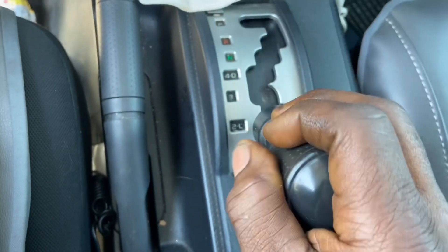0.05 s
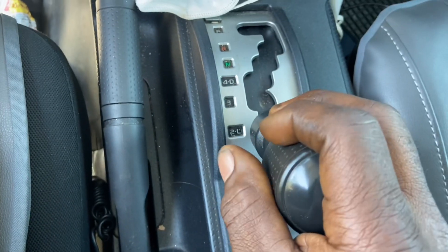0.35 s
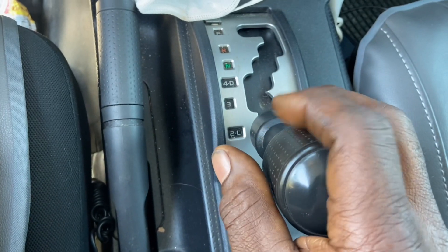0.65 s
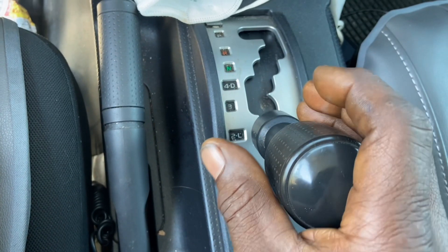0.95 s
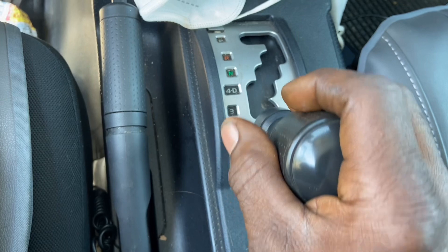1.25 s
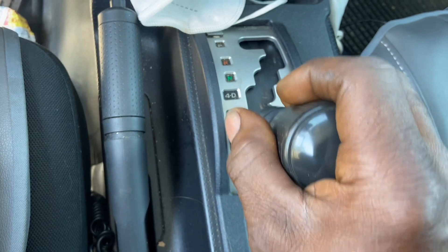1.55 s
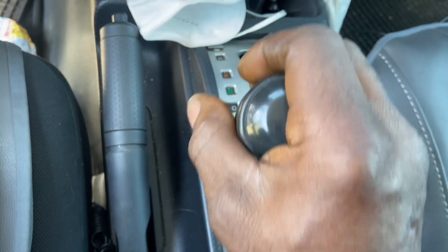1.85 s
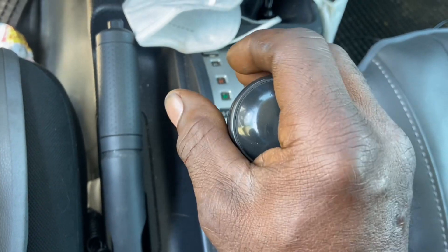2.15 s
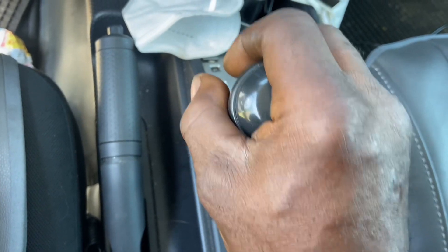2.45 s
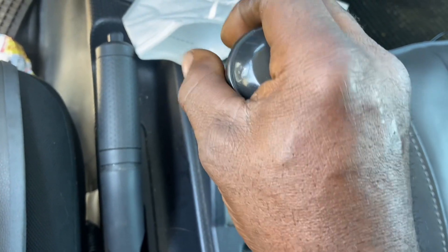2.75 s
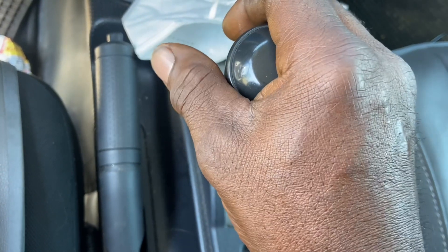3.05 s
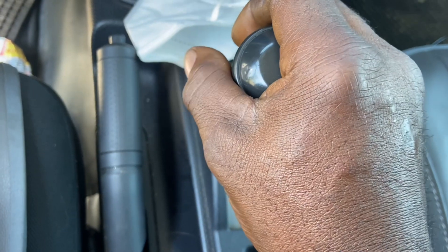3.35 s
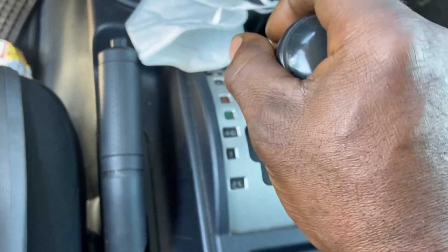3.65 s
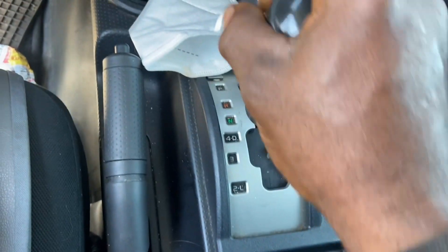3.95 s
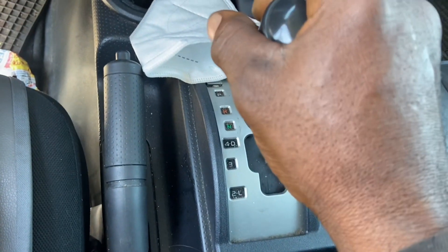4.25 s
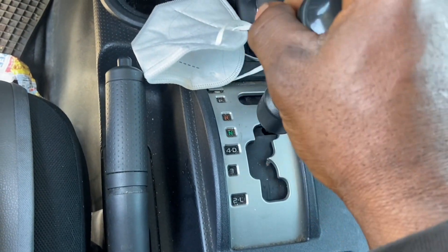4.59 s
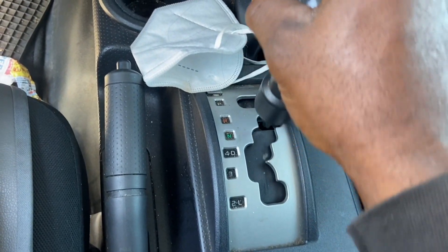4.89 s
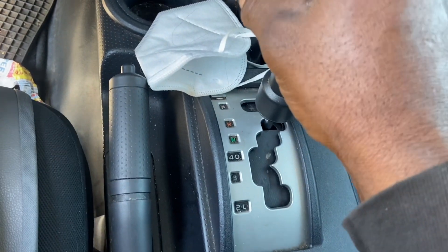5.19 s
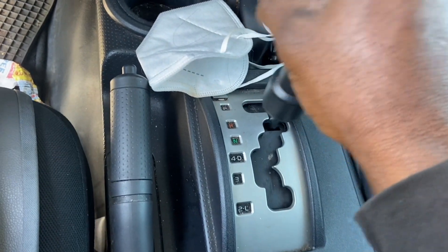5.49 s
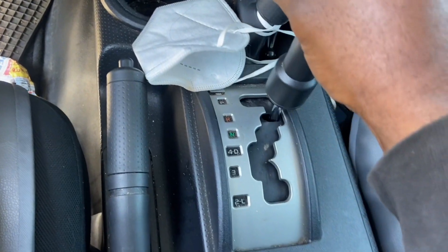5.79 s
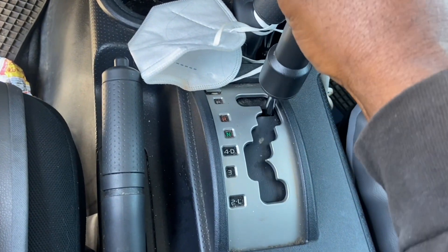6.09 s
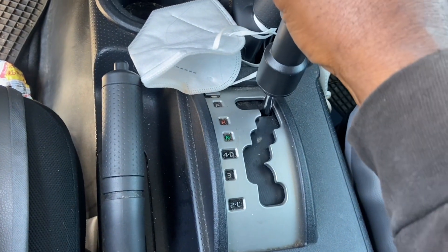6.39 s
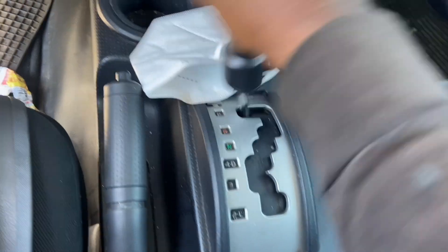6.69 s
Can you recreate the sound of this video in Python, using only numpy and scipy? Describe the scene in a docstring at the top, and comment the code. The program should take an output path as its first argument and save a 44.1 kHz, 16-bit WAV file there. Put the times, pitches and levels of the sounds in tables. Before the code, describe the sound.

Inside a parked car, a petrol engine idles with a low hum over steady fan noise and a very faint high whine. Close by, a gear selector moves through its stepped gate, each stop giving a plastic click and a hollow console thud, sometimes with a low boom from the body. Light knocks come in the first second, a firm rattling clunk at 1.7 seconds and a dull knock at 2.6. Outside, tyre noise from a passing vehicle swells, peaks around 3.5 seconds and slowly fades. A sharp metallic double snap sounds at 3.5, a thud at 4, a light click at 4.5 and a strong clack at 4.9. The idle rises from about 4.5 seconds, then drops near 5.7 with a thud and a low shudder. Around 6.6 to 6.8 seconds the lever scrapes and rattles through a quick cluster of clicks.

```python
"""A gear selector is worked through its stepped gate inside a parked car: each stop scrapes, clicks,
rings the steel latch and plastic plate and thuds in the console shell; the body booms as load shifts.
The V6 petrol engine idles, its orders humming through body resonances, and speeds up in neutral.
Outside, a vehicle rolls by with a slow swell of tyre noise. Under it all: fan noise, a faint whine."""
import sys
import numpy as np
from scipy import signal
from scipy.fft import rfft, irfft
from scipy.io import wavfile
from scipy.ndimage import uniform_filter1d, map_coordinates

SR = 44100
rng = np.random.default_rng(int(sys.argv[2]) if len(sys.argv) > 2 else 0)


def transcribe(u):
    """Save the signal u as a 16-bit wav file named by the first command-line argument.

    u: samples, shape (n,) or (channels, n), limited to [-1, 1]; the rate is SR.
    q: integer samples, one column per channel.
    """
    v = np.clip(np.atleast_2d(u).T, -1, 1)
    q = np.round(v * 32767).astype(np.int16)
    wavfile.write(sys.argv[1], SR, q)


N = 301316
T = np.arange(N) / SR
HZ = np.maximum(np.arange(N // 2 + 1) * SR / N, 1)

# Table levels are relative; the functions add their own gains.
# lever on gate: t/s, level/dB, click offset/dB, thud offset/dB, scrape time/s, top f/Hz
KNOCKS = [(.002, -44, -14, 13, 0.0048, 1780), (.709, -45, -20, 1, .0005, 1700),
          (1.014, -49, -23, 3, 0.0017, 1600), (1.6845, -32.5, -20, 3.5, 0.00072, 1700),
          (1.6895, -33, -22, 6.5, .0014, 900), (1.702, -48, 0.5, 13, .006, 2000),
          (1.817, -42, -18, 2, .0006, 1720), (1.849, -47.5, -11, 5, 0.0029, 1890),
          (2.581, -33.5, -29, 2, 0.0029, 1060), (3.959, -36.5, -12, 10, 0.0045, 1800),
          (4.491, -47, -13, 3, 0.00094, 2200), (4.907, -41, -2.5, 3, 0.0043, 3000),
          (4.915, -26, -8.5, 2, 0.00092, 2400), (5.469, -53.5, -8, 4, 0.0031, 4000),
          (5.696, -46.5, -17, 7.5, .022, 1480), (5.933, -51.5, -11, 3.5, 0.0021, 3000),
          (6.239, -57.5, -13, 17, 0.01, 1600), (6.589, -49, 0, 4, .0088, 4000),
          (6.603, -39.5, -10, 4, 0.00057, 2600), (6.612, -39.5, -10, 11.5, 0.0041, 2200),
          (6.645, -53, -12, 14, 0.0036, 2000), (6.67, -53, -1, 13, 0.0065, 1500),
          (6.699, -41, -9, 4, 0.0044, 2200), (6.71, -39.5, -12, 6.5, 0.0022, 2200)]
# detent snaps: t/s, level/dB, thud offset/dB, latch offset/dB, knock offset/dB, favoured f/Hz
DETENTS = [(3.546, -37, -2, 9, 2, 3920), (3.562, -30.5, 1.5, 1.5, -13, 2720), (4.541, -54, 9, 3, -1, 3920),
           (4.86, -54.5, 0, -5, -8, 7500), (5.549, -52, 11, 0, 0, 3920), (5.563, -61, -3, -7, -8, 6300),
           (5.97, -56, -9, -7, -6, 3920), (6.686, -54, 0, -6, -9, 7500), (6.757, -61, 0, -11, -12, 7500)]
# modes: f/Hz, level/dB, t60/s
SHELL_MODES = [(131.8, -1.5, 0.11), (177.2, 0, 0.16), (216, 1, 0.13), (252, -0.5, 0.11), (285.3, 4.5, 0.08),
               (342.7, -12, 0.18), (378.4, -3.5, 0.084), (440, 1, 0.07), (508.5, -4.5, 0.084),
               (620, -19, 0.099)]  # hollow console
PLATE_MODES = [(724, 4.5, 0.11), (860, -11, 0.023), (990, 7, 0.074), (1260, -2, 0.02), (1564, 11, 0.033),
               (1827, 9, 0.02), (2200, 9.5, 0.023), (2690, 2, 0.023), (3230, -1, 0.02)]  # plastic gate plate
LATCH_MODES = [(1620, 0, .03), (1900, 0, .03), (2720, -3, .028), (3350, -7, .018), (3920, -3, .024),
               (4780, -13, .018), (6300, -14, .02), (7500, -10, .025)]  # steel detent and latch
# chatter over the gate's steps: t/s, half length/s, level/dB
RATTLE_BURSTS = [(1.691, .004, -43), (1.708, .005, -48), (6.611, .008, -41), (6.623, .006, -44),
                 (6.668, .03, -53), (6.711, .009, -40)]
# body booms: t/s, f/Hz, level/dB, rise/cycles
BOOMS = [(0.285, 62.6, -36, 1.6), (0.423, 53.5, -30, 1), (1.698, 170, -27, 1.1), (1.713, 135, -32, 1.4),
         (2.597, 69, -27, 1.3), (3.573, 111, -31, 1.8), (3.964, 100, -31, 3), (3.975, 55, -33, 1.8),
         (4.084, 61.6, -25, 1.84), (4.919, 175, -25, 1.4), (4.93, 130, -33, 1.6), (4.98, 54.3, -24.5, 2.3),
         (5.001, 34.85, -30, 3.4), (5.695, 135.5, -30.5, 2.3), (5.705, 98, -26.5, 1.5),
         (6.62, 115.3, -27, 2), (6.69, 100.2, -28, 3.1), (6.721, 50.7, -28.5, 1.2)]

# firing rate, up in neutral, down as reverse takes load: t/s, f/Hz
FIRING_RATE = [(0, 30.79), (.8, 29.78), (3.2, 29.23), (4.1, 30.1), (4.5, 31.59), (5.0, 35.29),
               (5.35, 37.39), (5.64, 40.03), (5.8, 36.4), (5.95, 31.04), (6.3, 32.38), (6.83, 32.54)]
# engine orders, 1.5 from the unequal banks: multiple of firing rate, level/dB
ORDERS = [(1, -53), (1.5, -50.5), (2, -43.5), (3, -51), (4, -56.5), (6, -59), (8, -63)]
# engine hum: t/s, level/dB
HUM_LEVEL = [(0, -1), (.7, -3), (1.4, 1), (2.2, 0.5), (3.4, 1.5), (4.2, 2), (5.4, 0), (6.1, 1.5), (6.83, 1)]
# engine load: t/s, shudder level/dB, third-order offset/dB
LOAD = [(0, -53, -2.5), (4.0, -47, 0), (4.35, -56, -5), (4.55, -51.5, 0.5), (5.6, -42, 1),
        (5.85, -43.5, -5.5), (6.1, -44, -6), (6.35, -51, 0), (6.83, -42.5, -4.5)]
# resonances and dips: f/Hz, width/Hz, gain/dB
BODY_RESONANCES = [(36.1, 6.1, 17.5), (78, 11.6, -0.5), (99.8, 9.6, 10), (113.6, 17.4, 12), (143, 21, -7)]
TREAD_RESONANCES = [(802, 103, 0.5), (1075, 28, -5.5), (1304, 55, -9.5), (1632, 68, -8.5), (2053, 88, -10),
                    (2330, 104, -12.5), (3430, 87, -21), (5030, 60, -18.5)]
CABIN_RESONANCES = [(226, 15, 3.5), (427, 43, 3.5), (566, 78, -6), (830, 36, -0.5), (960, 72, 3.5),
                    (1143, 37, 2.5), (1200, 46, -3.5), (1820, 70, 3), (2320, 450, 2.5), (2550, 69, 2.5),
                    (3050, 110, 4), (4750, 1400, 5)]

PASS_S, SPEED_M_S, LANE_M = 3.525, 9.37, 4.12
# pass-by laws: base level/dB, loss per tenfold distance/dB, gain once past/dB, beam lead/m
RUMBLE_LAW, ROAR_LAW = (-35, 27.5, 3.5, -0.5), (-41, 23.5, -1, -0.44)
HISS_LAW, TREAD_LAW = (-48, 21.5, -8.5, 2), (-49, 14, -10.5, 2.5)
# vehicle reflections: delay when nearest/s, gain
ECHOES = [(.0012, .12), (.0036, .22), (.0058, .28), (.0082, .24), (.0135, .2)]
# electrical whine: t/s, level/dB
WHINE_LEVEL = [(0, -82), (1.5, -83), (3, -86), (4.2, -89), (5, -84), (5.7, -83), (6.1, -95), (6.5, -92),
               (6.83, -85)]
# squeaks and pings: t/s, f/Hz, level/dB, half length/s
SQUEAKS = [(.14, 7440, -76, 0.024), (.35, 2790, -75, .3), (0.478, 7400, -76, 0.028),
           (4.4945, 3790, -49.5, 0.0021), (6.15, 4290, -80, .35)]

# noise spectra: f/Hz, density/dB
CLICK_SPECTRUM = [(600, -32), (1700, 12.5), (2800, 7.5), (4200, 0.5), (5600, 0.5), (7500, 2), (11000, -2.5),
                  (16000, -11)]  # bright contact noise
CLACK_SPECTRUM = [(200, -13), (450, 14), (750, 3), (1200, 2), (1650, -9.5), (2400, -19), (3600, -13.5),
                  (6000, -22.5), (16000, -61)]  # dense, damped trim modes
RATTLE_SPECTRUM = [(300, -11), (600, 7), (1000, -8.5), (1600, 5.5), (2200, -10.5), (3600, -10), (5000, -19),
                   (7300, -17), (16000, -25)]  # loose plastic
SHUDDER_SPECTRUM = [(35, -31), (55, 2), (70, 3), (95, -2.5), (125, 0), (150, -14.5), (300, -51.5)]  # car body
RUMBLE_SPECTRUM = [(90, -10.5), (150, -1), (230, 2), (330, -7.5), (480, -7), (650, -7), (950, -29.5),
                   (1500, -31), (5000, -94)]  # tyres, low
ROAR_SPECTRUM = [(300, -6.5), (560, 0.5), (850, 1), (1080, 2.5), (1380, -0.5), (1850, -2.5), (2500, -8.5),
                 (4000, -22.5), (8000, -45), (16000, -103)]  # tyres, mid
HISS_SPECTRUM = [(900, -22), (2200, 10), (3500, 8), (5500, 0.5), (7500, 2), (11000, 1), (16000, -5)]  # tyres, high
BULKHEAD_SPECTRUM = [(15, -33), (28, -20), (48, 5.5), (72, 4), (105, -9.5), (150, -11.5), (200, -14.5),
                     (400, -15.5), (560, -25.5), (900, -31), (2500, -41), (6000, -55.5), (16000, -102)]  # engine and fan
FAN_SPECTRUM = [(900, -30), (2200, 16), (3500, 6), (5500, 0), (7500, -2), (11000, -1.5), (16000, -9)]  # steady cabin hiss

# stereo width: f/Hz, side minus mid/dB
AIR_WIDTH = [(38, -41), (70, -5), (120, -0.5), (220, -5.5), (400, -1.5), (700, 4), (1300, 6), (2400, -7),
             (4400, -3), (9000, 3)]
LEVER_WIDTH = [(60, 0), (200, -19), (380, -14), (700, -8), (1300, -4), (2400, -5), (4400, -5), (9000, 3)]
# treble widener: f/Hz, phase between channels/turns
WIDENER_PHASE = [(7500, 0), (8600, .5), (9600, .5), (10500, 1), (11600, 1), (12550, 1.5), (13700, 1.5),
                 (14550, 2)]


def selector(crack_t60_s=.038, tail_t60_s=.39, scrape_gain=.38):
    """Each contact scrapes, cracks, rings latch and plate and shakes the shell; the cabin adds a tail."""
    out, t = np.zeros(N + SR), T[:SR // 4]
    click_noise = np.pad(noise(CLICK_SPECTRUM), (0, SR), mode="wrap")
    clack_noise = np.pad(noise(CLACK_SPECTRUM), (0, SR), mode="wrap")
    for at_s, thud_db, knock_db, click_db, latch_db, latch_modes, scrape_s, top_hz in contacts():
        start = int(at_s * SR)
        span = slice(start, start + len(t))
        rise, seated_s = np.minimum(t / scrape_s, 1), np.maximum(t - scrape_s, 0)
        crack = rise * undb(-60 * seated_s / crack_t60_s)
        tail = rise * undb(-60 * seated_s / tail_t60_s)
        clack = (crack + undb(-21) * tail) * clack_noise[span]
        click = (crack + undb(-29) * tail) * click_noise[span]
        force = scrape_gain * rng.standard_normal(len(t)) * (t / scrape_s) * np.exp(-t / scrape_s)
        force[0] += 1  # one blow ahead of the tiny slips
        plate_modes = hardened(softened(PLATE_MODES, top_hz), 0.44 * top_hz)
        plate = ring(plate_modes, rise_cycles=0.74, detune=0.0078, scatter_db=0)
        plate = signal.fftconvolve(force, plate)[:len(t)]
        latch = ring(latch_modes, rise_cycles=0.42, detune=0.0099, scatter_db=1)
        latch = signal.fftconvolve(force, latch)[:len(t)]
        shell = ring(softened(SHELL_MODES, 0.32 * top_hz), rise_cycles=1.84, detune=0.031, scatter_db=1)
        out[span] += undb(thud_db + 1.1) * unit_burst(shell, window_s=0.011)
        out[span] += undb(knock_db - 4) * unit_burst(plate, window_s=0.0055)
        out[span] += undb(knock_db - 1) * unit_burst(clack, window_s=0.0068)
        out[span] += undb(click_db + 1) * unit_burst(click, window_s=0.0025)
        out[span] += undb(latch_db) * unit_burst(latch, window_s=0.0036)
    return out[:N]


def contacts(knock_latch_db=-17, snap_s=.0006, snap_top_hz=4000):
    """Knocks barely stir the latch; detent snaps are short and hard and ring it."""
    for at_s, db, click_db, thud_db, scrape_s, top_hz in KNOCKS:
        latch_db = click_db + knock_latch_db
        yield at_s, db + thud_db, db, db + click_db, db + latch_db, LATCH_MODES, scrape_s, top_hz
    for at_s, db, thud_db, latch_db, knock_db, favoured_hz in DETENTS:
        modes = struck(LATCH_MODES, favoured_hz)
        yield at_s, db + thud_db, db + knock_db, db, db + latch_db, modes, snap_s, snap_top_hz


def ring(modes, rise_cycles, detune, scatter_db):
    """One blow on a set of modes; each builds over rise_cycles, so the lows come late."""
    t = T[:SR // 4]
    hz, db, t60_s = np.transpose(modes)[:, :, None]
    pitch_draw, phase_turns, level_draw = rng.standard_normal((3, len(modes), 1))
    swell = 1 - np.exp(-(t * hz / rise_cycles) ** 2)
    waves = np.sin(2 * np.pi * (hz * (1 + detune * pitch_draw) * t + phase_turns))
    return np.sum(undb(db + scatter_db * level_draw - 60 * t / t60_s) * swell * waves, axis=0)


def softened(modes, top_hz):
    """A soft contact barely excites modes above top_hz."""
    return [(hz, db - 10 * np.log10(1 + (hz / top_hz) ** 6), t60_s) for hz, db, t60_s in modes]


def hardened(modes, bottom_hz):
    """A hard contact is too short to push modes below bottom_hz."""
    return [(hz, db - 10 * np.log10(1 + (bottom_hz / hz) ** 4), t60_s) for hz, db, t60_s in modes]


def struck(modes, favoured_hz, width_hz=700, boost_db=7):
    """The strike point favours one mode."""
    peak = [(favoured_hz, width_hz, boost_db)]
    return [(hz, db + resonance_db(peak, hz), t60_s) for hz, db, t60_s in modes]


def rattle(ticks_per_s=1500):
    """Loose plastic chatters in dense ticks as the lever crosses the steps."""
    ticks = (rng.random(N) < ticks_per_s / SR) * rng.standard_normal(N)
    bursts = sum(undb(db) * bell(at_s, half_s) for at_s, half_s, db in RATTLE_BURSTS)
    return bursts * unit(filtered(ticks, response(RATTLE_SPECTRUM)))


def slide(level_db=-57):
    """The lever rubs along the gate in one quick pull."""
    return undb(level_db + walk(84.7)) * bell(at_s=6.66, half_s=0.085, power=4) * noise(CLICK_SPECTRUM)


def booms():
    """The body swells into a low note and settles as the lever lands or the gearbox load shifts."""
    out = np.zeros(N)
    for at_s, hz, db, rise_cycles in BOOMS:
        cycles = hz * np.maximum(T - at_s, 0)
        age = cycles / rise_cycles
        out += undb(db) * age * np.exp(1 - age) * np.sin(2 * np.pi * cycles)
    return out


def engine(speed_jitter=0.00902, flutter_db=3, gain_db=-1):
    """Uneven firings hum through the body, orders louder at its resonances. Returns hum, firing phase."""
    firing_hz, = curves(FIRING_RATE)
    phase = 2 * np.pi * np.cumsum(firing_hz * (1 + speed_jitter * walk(5))) / SR
    _, third_order_db = curves(LOAD)
    hum = np.zeros(N)
    for order, db in ORDERS:
        load_db = third_order_db if order == 3 else 0
        body_db = resonance_db(BODY_RESONANCES, order * firing_hz)
        gain = undb(db + load_db + body_db + flutter_db * walk(16.4))
        hum += gain * np.sin(order * phase + rng.uniform(0, 2 * np.pi))
    return np.sqrt(2) * undb(gain_db + curves(HUM_LEVEL)[0]) * hum, phase


def shudder():
    """The body rumbles, most while reverse drags the engine down."""
    return undb(curves(LOAD)[0]) * noise(SHUDDER_SPECTRUM)


def passing_vehicle(sweep_s=3.655):
    """Tyre noise swells and fades; reflections lag more as the vehicle nears, sweeping combs through it."""
    rumble = undb(pass_db(*RUMBLE_LAW) + 1.3 * walk(13)) * noise(RUMBLE_SPECTRUM)
    roar = undb(pass_db(*ROAR_LAW) + 1.1 * walk(7.5)) * noise(ROAR_SPECTRUM)
    hiss = undb(pass_db(*HISS_LAW)) * noise(HISS_SPECTRUM)
    tyres = rumble + roar + hiss + tread()
    nearness = 1 / np.hypot(1, (T - PASS_S) / sweep_s)
    reflected = sum(gain * map_coordinates(tyres, [(T - delay_s * nearness) * SR], order=1)
                    for delay_s, gain in ECHOES)
    return (tyres + reflected) / np.sqrt(1 + sum(gain ** 2 for _, gain in ECHOES))


def tread(sound_m_s=343):
    """Narrow tread resonances, Doppler-shifted down as the vehicle passes."""
    gain = sum(undb(db) / (1 + (2 * (HZ - hz) / width_hz) ** 2) for hz, width_hz, db in TREAD_RESONANCES)
    song = unit(filtered(rng.standard_normal(N), gain))
    delay_s = np.hypot(LANE_M, SPEED_M_S * (T - PASS_S)) / sound_m_s
    return undb(pass_db(*TREAD_LAW)) * map_coordinates(song, [(T - delay_s) * SR], order=1, mode="mirror")


def pass_db(base_db, spreading_db, behind_db, lead_m, screen_db=9):
    """Level falls with distance; hiss beams forward, rumble backward; an obstacle screens the start."""
    distance_m = np.hypot(LANE_M, SPEED_M_S * (T - PASS_S) + lead_m)
    gone_by = (1 + np.tanh((T - 3.93) / .18)) / 2
    hidden = (1 - np.tanh((T - 0.79) / 0.45)) / 2
    return base_db - spreading_db * np.log10(distance_m / LANE_M) + behind_db * gone_by - screen_db * hidden


def cabin_noise(firing_phase, rumble_db=-41, hiss_db=-73.5, throb_depth=0.14):
    """Engine and fan noise through the bulkhead, throbbing with the firings, plus a steady hiss."""
    rumble = undb(rumble_db + 0.36 * walk(22)) * noise(BULKHEAD_SPECTRUM)
    return rumble * (1 + throb_depth * np.sin(firing_phase)) + undb(hiss_db) * noise(FAN_SPECTRUM)


def whirr(level_db=-67):
    """Soft narrow-band whirr while the gearbox holds reverse."""
    band = noise([(2000, -36), (2420, 0), (2500, 0), (2580, -24), (3000, -43), (6000, -70)])
    return undb(level_db) * bell(at_s=5.97, half_s=0.35, power=4) * band


def high_tones(whine_hz=10720, whine_waver_hz=14, squeak_waver_hz=50):
    """A thin wavering electrical whine and a few faint squeaks."""
    whine = undb(curves(WHINE_LEVEL)[0] + 2 * walk(12)) * tone(whine_hz + whine_waver_hz * walk(32.4))
    squeaks = sum(undb(db) * bell(at_s, half_s) * tone(hz + squeak_waver_hz * walk(123))
                  for at_s, hz, db, half_s in SQUEAKS)
    return whine + squeaks


def cabin_colour(x):
    """Cabin resonances colour airborne noise."""
    return filtered(x, undb(resonance_db(CABIN_RESONANCES, HZ) - 2))


def stereo(direct, scattered, width, direct_share, lean_left, port_lag_s=.00043):
    """Mid is the direct sound; side mixes the lag between two ports, cabin scatter and a left bias."""
    spectrum = rfft(direct)
    lagged = 1j * np.sqrt(2) * np.sin(2 * np.pi * HZ * port_lag_s) * spectrum
    spread = np.sqrt(direct_share) * lagged + np.sqrt(1 - direct_share) * rfft(scattered)
    lean_shape = response([(35, -5), (80, 1), (600, 16), (1200, 8), (4500, 5.5), (8000, -7)])
    lean = np.tanh(lean_left * np.log(10) / 40) * lean_shape
    side = irfft(response(width) * spread + lean * spectrum, N)
    return np.array([direct + side, direct - side])


def widen(pair, crossover_hz=6300):
    """Both channels get the same treble, in phase and antiphase in alternate bands."""
    treble = 1 / (1 + (crossover_hz / HZ) ** 24)
    turns = np.interp(HZ, *np.transpose(WIDENER_PHASE))
    spread = rfft(pair.mean(axis=0)) * np.exp(1j * np.pi * turns * np.array([[-1], [1]]))
    return irfft((1 - treble) * rfft(pair) + treble * spread, N)


def undb(db):
    """Decibels to gain."""
    return 10 ** (np.asarray(db) / 20)


def unit(x):
    """Scale to rms 1."""
    return x / np.sqrt(np.mean(x ** 2))


def unit_burst(x, window_s):
    """Scale the loudest window to rms 1."""
    return x / np.sqrt(uniform_filter1d(x ** 2, int(window_s * SR), mode="constant").max())


def bell(at_s, half_s, power=2):
    """Bell envelope; higher power, flatter top."""
    return np.exp(-((T - at_s) / half_s) ** power)


def tone(hz):
    """Sine of rms 1 along a frequency curve."""
    return np.sqrt(2) * np.sin(2 * np.pi * np.cumsum(hz) / SR)


def curves(table):
    """Table columns, interpolated in time."""
    times_s, *columns = np.transpose(table)
    return [np.interp(T, times_s, column) for column in columns]


def response(points):
    """Gain per FFT bin from points: f/Hz, level/dB."""
    hz, db = np.transpose(points)
    return undb(np.interp(np.log(HZ), np.log(hz), db))


def resonance_db(peaks, hz):
    """Summed boost of the resonances at hz."""
    return sum(db / (1 + (2 * (hz - centre_hz) / width_hz) ** 2) for centre_hz, width_hz, db in peaks)


def filtered(x, gain):
    """Apply a gain per FFT bin."""
    return irfft(rfft(x) * gain, N)


def noise(spectrum):
    """Shaped noise, rms 1."""
    return unit(filtered(rng.standard_normal(N), response(spectrum)))


def walk(rate_hz):
    """Slow random drift, rms 1."""
    bin_hz = np.arange(len(HZ)) * SR / N
    return unit(filtered(rng.standard_normal(N), np.exp(-(bin_hz / rate_hz) ** 2)))


def scene():
    """Selector, engine and street in stereo; a second random draw serves as cabin scatter."""
    hum, firing_phase = engine()
    air, scattered_air = (cabin_colour(cabin_noise(firing_phase) + passing_vehicle()) for _ in range(2))
    background = air + hum + shudder() + booms() + whirr() + high_tones()
    lever, scattered_lever = (selector() + slide() + rattle() for _ in range(2))
    return (stereo(lever, scattered_lever, LEVER_WIDTH, direct_share=0.16, lean_left=1)
            + stereo(background, scattered_air, AIR_WIDTH, direct_share=0.12, lean_left=2.5))


def record(dry):
    """Treble widener, 16 Hz high-pass, steep 15.9 kHz low-pass."""
    highpass = signal.butter(2, 16, "highpass", fs=SR, output="sos")
    lowpass = signal.ellip(10, .2, 80, 15900, fs=SR, output="sos")
    return signal.sosfilt(lowpass, signal.sosfilt(highpass, widen(dry)))


dry = scene()
out = record(dry)
transcribe(out)
```